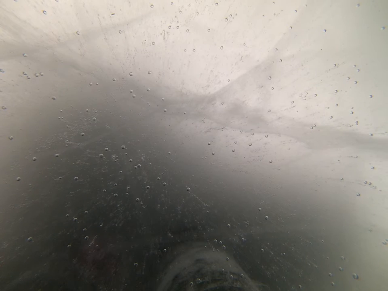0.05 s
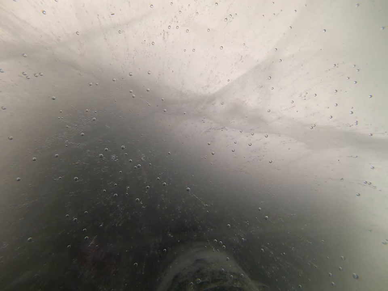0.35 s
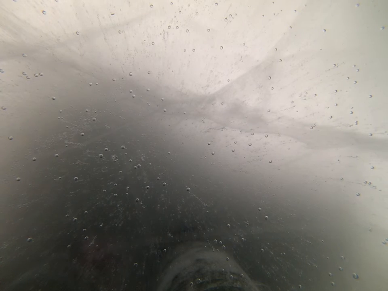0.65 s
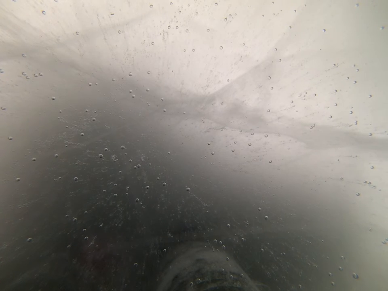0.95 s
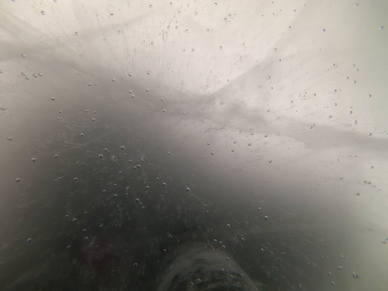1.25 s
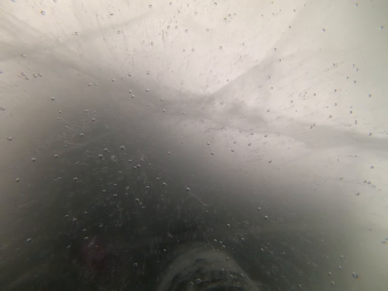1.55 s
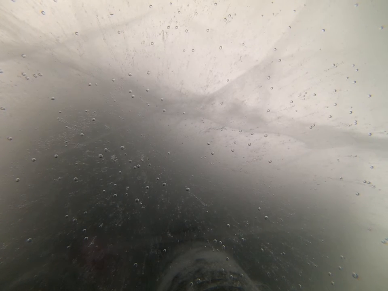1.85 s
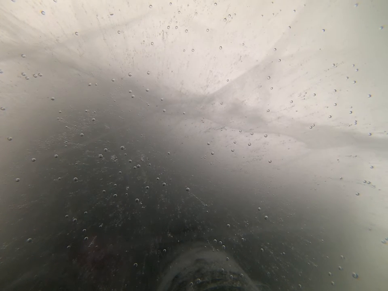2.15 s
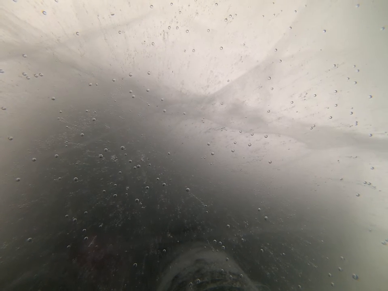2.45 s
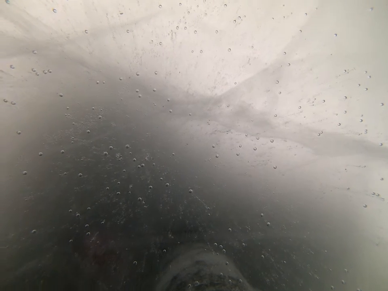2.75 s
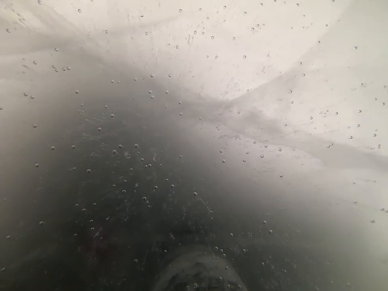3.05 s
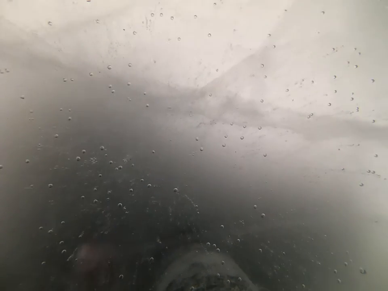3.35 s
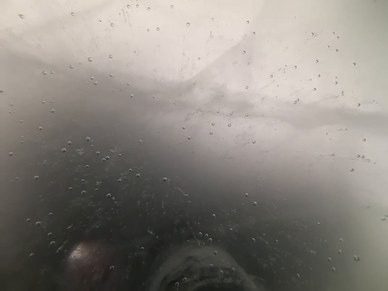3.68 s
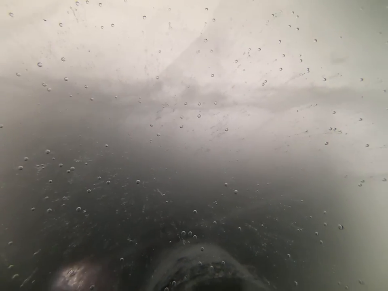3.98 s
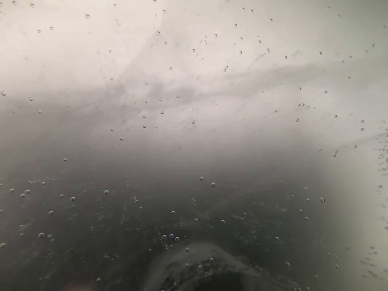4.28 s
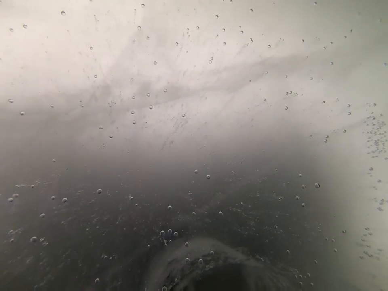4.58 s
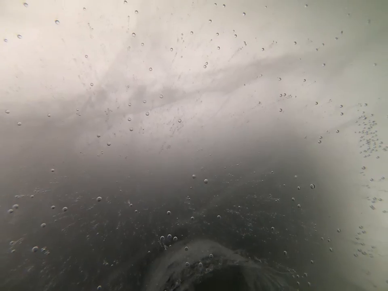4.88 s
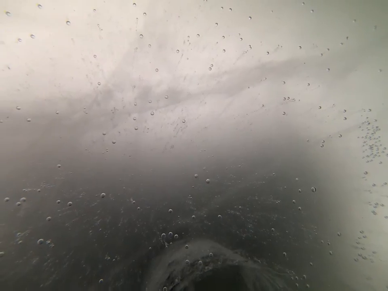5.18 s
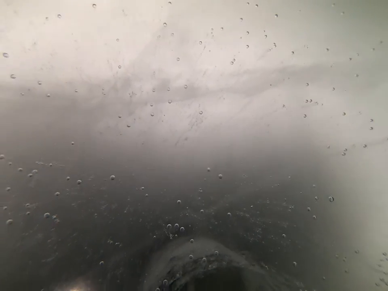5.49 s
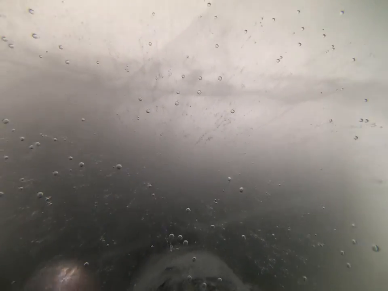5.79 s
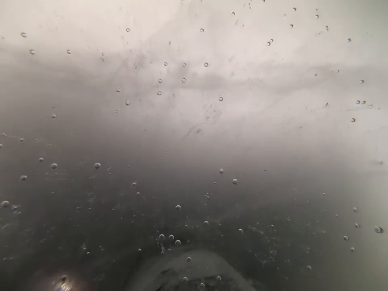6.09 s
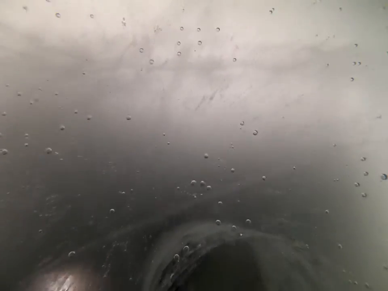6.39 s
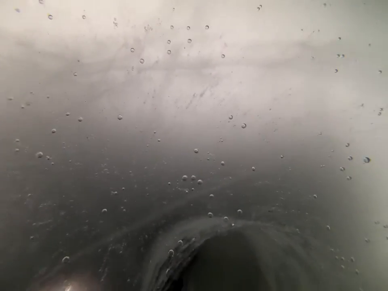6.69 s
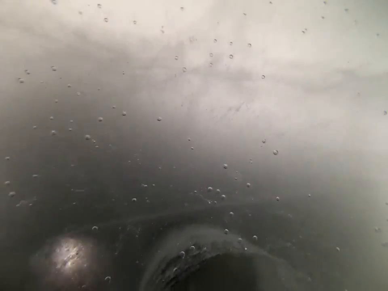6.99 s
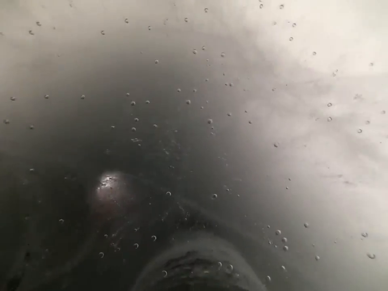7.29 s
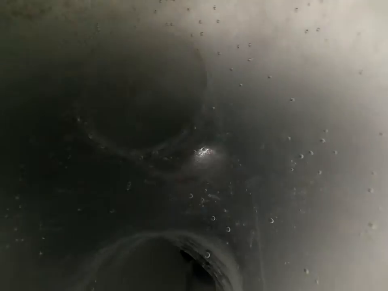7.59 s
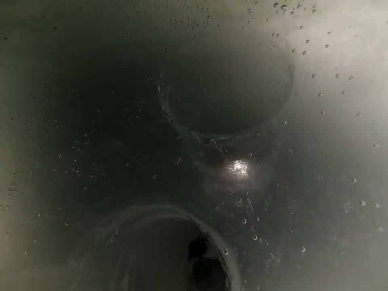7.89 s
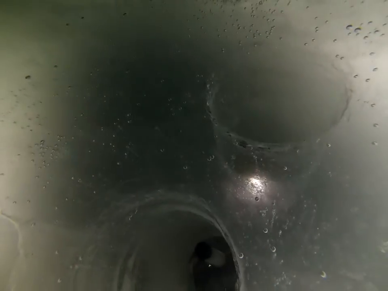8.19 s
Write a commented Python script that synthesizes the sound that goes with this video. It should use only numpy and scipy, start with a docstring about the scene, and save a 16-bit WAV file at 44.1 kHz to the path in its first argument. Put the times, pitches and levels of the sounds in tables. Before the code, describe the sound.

For the first three seconds, water washes quietly past a submerged microphone housing, with a low rumble, faint fizz and a wavering hollow tone. A few brief squeaks and a soft thud come in the first second, and a small cluster of bubbles near 1.9 seconds. At 3 seconds a pole strikes ice with a loud, hollow knock, a thud and a sharp click, followed by faint crackling. A deep, unsteady rumble starts and stays. A second hard knock lands at 3.6 seconds. From then on, muffled, gritty scraping strokes swell and ease, strongest from about 5.7 to 6.4 seconds. Lighter knocks are scattered through them, each a quick falling chirp with a short ring. Low thuds with dry clicks jolt the housing around 4.6, 5.5, 6.2, 7.5 and 8.1 seconds. Everything sounds very close and dull, ending just after 8 seconds.

```python
"""A pole knocks and scrapes on ice, carrying a camera in a waterproof housing under the water.
At first water washes quietly past, with a few bubbles and squeaks. Then come the knocks: high notes run
along the pole faster than low ones, so each is a quick falling chirp that leaves the camera mount ringing.
Each scraping stroke swells and eases. The pole sways with a deep rumble and jolts thud in the housing.
Sharp dry clicks are heard, mostly at the jolts, and a limiter turns down the hardest knocks."""
import sys
import numpy as np
from scipy import signal
from scipy.fft import rfft, irfft, next_fast_len
from scipy.io import wavfile
from scipy.ndimage import uniform_filter1d, minimum_filter1d, map_coordinates

SR = 44100
rng = np.random.default_rng(int(sys.argv[2]) if len(sys.argv) > 2 else 0)


def generate_wav(signal):
    """Clip the signal to [-1, 1] and save it as 16-bit WAV at the path in sys.argv[1]."""
    frames = np.transpose(np.atleast_2d(signal))
    scaled = np.clip(frames, -1, 1) * 32767
    pcm = np.round(scaled).astype(np.int16)
    wavfile.write(sys.argv[1], SR, pcm)


N = 367794
TIME = np.arange(N) / SR

# water passing the housing: t/s, wash/dB, fizz/dB, rumble/dB
WATER_FLOW = [(0, -46.5, -70, -44), (.25, -46, -69, -37.5), (.68, -50, -71, -42.5), (1.28, -47, -67, -40),
              (1.55, -45.5, -65.5, -41), (1.87, -42.5, -63.5, -39.5), (2.15, -45, -70, -44.5),
              (2.38, -45, -67, -39), (2.68, -47.5, -66, -39.5), (2.92, -38.5, -68, -32),
              (3.3, -48, -79.5, -23), (3.55, -39.5, -71.5, -37), (3.9, -41.5, -88.5, -35.5)]
# swirls of water brushing the housing: t/s, half length/s, wash swell/dB, swish swell/dB
SWIRLS = [(0.102, 0.013, -3, 2.5), (0.403, 0.066, 4.5, 1.5), (0.502, 0.017, 7.5, 4.5),
          (0.666, 0.013, 2.5, 2), (0.902, 0.043, 3.5, 3.5), (1.038, 0.014, 4, 3.5), (1.152, 0.028, 5, 1.5),
          (1.311, 0.037, 5, 0), (1.383, 0.027, 5, 9), (1.541, 0.011, 0, 6.5), (1.866, 0.0083, 5, 6),
          (2.227, 0.016, 5, 5.5), (2.377, 0.066, 4.5, 6), (3.22, 0.034, 6.5, 10)]
# tone colours of the water, from low to high: f/Hz, level/dB
RUMBLE_SPECTRUM = [(8, 1), (16, 11.5), (30, 11), (50, 5.5), (70, 1.5), (120, -12.5), (180, -15.5),
                   (300, -21), (600, -88.5)]
WASH_SPECTRUM = [(70, -4.5), (110, 3.5), (175, 2.5), (280, -6.5), (440, -5), (590, -2.5), (700, -4.5),
                 (810, -9.5), (950, -13), (1250, -20.5), (1800, -57.5)]
SWISH_SPECTRUM = [(900, 6.5), (1300, -5.5), (1590, 8.5), (1790, -1.5), (2000, -1), (2270, 5.5),
                  (2600, -2.5), (3050, -11.5), (4500, -23.5)]
FIZZ_SPECTRUM = [(2800, -17), (3600, 7), (4200, -1.5), (5000, 2), (5800, -1.5), (6600, 5.5), (7200, -1.5),
                 (7900, -7), (9300, -3), (10100, -8.5), (11000, -2), (12200, -16), (15500, -14)]
# the housing's hollow ring in the flow: t/s, f/Hz, level/dB
HOLLOW_NOTES = [(0, 700, -54), (.08, 688, -47), (.35, 667, -46), (.47, 606, -50), (.58, 575, -59.5),
                (.85, 600, -57), (1.15, 687, -50), (1.37, 650, -49.5), (1.48, 680, -55.5),
                (1.75, 587, -44.5), (1.9, 606, -48), (2.06, 678, -46.5), (2.2, 597.3, -60), (2.9, 594, -55),
                (3.5, 505, -54.5)]
# squeaks of the housing: t/s, rise/s, f/Hz, glide/(Hz per s), width/Hz, level/dB
HOUSING_SQUEAKS = [(0.069, 0.022, 1566, 0, 35, -54.5), (.21, 0.0097, 677, 0, 40, -38),
                   (0.199, 0.016, 1595, 0, 50, -55), (0.479, 0.016, 1620, -3, 50, -67),
                   (.87, 0.017, 1620, 0, 50, -63), (3.032, 0.011, 3880, -9000, 420, -61),
                   (3.561, .007, 1740, -3, 91.4, -43)]
# jolts of the mount: t/s, swing/dB, punch/dB
JOLTS = [(0.172, -11.5, -44), (2.957, -4, -7), (3.25, -10, -43), (3.272, -22.5, -20), (3.577, -3.5, -11.5),
         (4.598, -9.5, -9), (4.654, -9.5, -14.5), (4.786, -9, -16), (5.055, -9, -17), (5.508, -5, -4.5),
         (5.589, -6.5, -16), (5.795, -13.5, -29), (6.183, -7, -12), (6.244, -12, -10), (6.327, -14, -26),
         (6.451, -9, -24), (6.996, -14.5, -49), (7.519, -4, -10.5), (8.108, -6.5, -12)]
# the pole's two slowest ways of bending: t/s, first f/Hz, second f/Hz
SWAY_NOTES = [(3.14, 35.58, 41.96), (3.28, 27.48, 43.1), (4.05, 27.9, 46.3), (4.75, 29.95, 45.94),
              (5.35, 25.63, 43.52), (5.65, 35.26, 43.78), (6.15, 33.55, 46.77), (6.3, 32.06, 54.6),
              (6.6, 24.89, 52.3), (7.2, 23.67, 52.23), (7.35, 24.54, 43.7), (8.3, 24.88, 45.4)]
# how widely each of the two swings: t/s, level/dB
FIRST_SWAY = [(2.7, -73), (2.97, -19.5), (3.42, -17), (3.8, -25), (4.03, -40), (4.3, -23.5), (4.65, -29),
              (4.9, -22), (5.08, -17.5), (5.42, -28), (5.9, -17.5), (6.2, -16.5), (6.75, -19.5),
              (7.05, -20), (7.22, -31), (7.38, -15), (7.85, -21), (8.34, -31.5)]
SECOND_SWAY = [(2.7, -62), (3.0, -24), (3.42, -40), (3.65, -27), (4.2, -32.5), (4.62, -16.5), (5.0, -39),
               (5.2, -17.5), (5.38, -41.5), (5.7, -22), (6.1, -27.5), (6.28, -17.5), (6.55, -33),
               (7.25, -32.5), (7.52, -22), (7.9, -29), (8.34, -40.5)]
# ringing notes of pole and housing: f/Hz, level hanging free/dB, level gripped/dB, time to fade 60 dB/s
MOUNT_NOTES = [(198, 6, -4.5, 0.28), (211.5, -6, 7.5, 0.21), (236.7, 7, -3.5, 0.28), (297.4, 4, -5, 0.16),
               (344, -12, -2.5, 0.12), (420, -6, 1, 0.12), (500, -4, -3, 0.15), (570, -1.5, 4.5, 0.14),
               (618, 2.5, -3.5, 0.12), (785, 8.5, 5.5, 0.082), (826, 16.5, 7, 0.035), (875, -1, -1, 0.054),
               (936, -17, 5.5, 0.095), (1072, -19, -2, 0.069), (1254, 2, 0.5, 0.065),
               (1540, -13, -9, 0.055), (1646, 13, 3, 0.052), (2250, -5.5, 6, 0.029)]
# the pole hits the ice: t/s, level/dB, boom/dB, clack/dB, hard edge/dB, distance along the pole/m,
# note favoured by the contact point f/Hz, its boost/dB
ICE_KNOCKS = [(2.9555, -8, -0.5, -7.5, -32, 0.15, 416, -26), (3.031, -19, -0.5, -4.5, -24, 0.18, 607, 1),
              (3.5755, -2, -7.5, -4.5, -14.5, 0.418, 420, -2.5),
              (3.592, -18.5, -11.5, -0.5, -19, 0.39, 612, 3), (3.976, -47, -9, -12, 4.5, 0.8, 444, 8),
              (4.199, -52, 8, 4, 7.5, 0.61, 837, 10), (4.325, -29, -4.5, -18, -29, 0.51, 479, 26),
              (4.433, -49, 14.5, -19, -27, 0.71, 500, 2), (4.537, -32.5, 2, -8.5, -18, 0.45, 425, 0),
              (4.592, -41, 10, -5, -7, 0.68, 500, 1), (4.663, -41.5, -12, -9.5, -21, 0.45, 504, -1),
              (5.048, -34, 5, -9, -10.5, 0.57, 490, 1), (5.152, -45, -13, -0.5, -5, 0.68, 794, -3),
              (5.505, -29, 4, 2, 2, 0.94, 813, -8), (5.576, -38.5, 6, -1, 3.5, 0.93, 430, 7),
              (5.683, -31, 1, 2, 0.5, 1, 493, -6), (5.789, -25, -8, -8, -12, 0.99, 502, 14),
              (5.8736, -29.5, -8.5, 8, 3, 0.78, 780, 3), (6.179, -24.5, 0.5, 0.5, -16, 0.6, 341, 18),
              (6.239, -20, 0.5, -2.5, -12, 0.55, 570, 8), (6.289, -20.5, -3.5, -9, -16, 0.54, 337, 17),
              (6.306, -28, 1, 0, -8, 0.547, 584, 1), (6.324, -15, -2.5, -4.5, -12, 0.52, 570, -14),
              (6.392, -35, 9.5, 2, -2.5, 0.53, 341, 17), (6.453, -35.5, 9, -3, -25, 0.74, 877, 4),
              (6.477, -43, -2, -7, -11, 0.58, 536.5, 9), (6.512, -25, -6.5, -2.5, -8, 1, 567, -10),
              (6.72, -33, -3, -6, -9.5, 0.4, 440, -4), (6.736, -33, -6, -4.5, -12, 0.5, 434, 2),
              (6.982, -28, -2.5, -7, -11, 1, 491, 7), (6.998, -43, 8, -7, -13, 0.46, 414, -3),
              (7.117, -34.5, 1.5, 1.5, -6, 0.44, 564, 17), (7.513, -32.5, 3.5, -14, -8, 0.84, 433, 6),
              (7.682, -34, 4.5, -27, -33, 0.49, 411.4, 27), (7.74, -38.5, -6, -22, -1, 0.55, 487, 11),
              (8.105, -38, -11, -20, -10, 0.57, 490, -3), (8.28, -40, 0.5, -11, -11.5, 1, 492, -6)]
# five bands of a knock (boom, hollow, middle, clack, hard edge), each a list of: f/Hz, level/dB
KNOCK_BANDS = [
    [(45, -51), (110, 2), (160, 0.5), (215, 2.5), (310, -15), (1800, -87)],
    [(70, -57.5), (310, 1.5), (410, 9.5), (510, 4), (2800, -101)],
    [(130, -46.5), (470, 9), (580, 5), (720, -4.5), (3800, -100.5)],
    [(200, -48), (690, -1), (840, 6), (1050, -4.5), (1400, -6), (7000, -86.5)],
    [(400, -27.5), (1400, 5.5), (1650, 9.5), (1900, 9.5), (2300, 3), (3500, -6), (4400, -12.5), (6800, -22),
     (8500, -60.5), (15000, -58.5)],
]
# pitches the mount passes on poorly: f/Hz, width/Hz, level/dB
MOUNT_NOTCHES = [(692, 68, -7), (1180, 53, -1.5), (1386, 85, -5.5), (1890, 99, -11.5), (2457, 33, -8),
                 (2780, 100, -6), (4200, 130, -6.5), (4730, 330, -5)]
# sharp clicks, mostly during jolts: t/s, level/dB
CLICKS = [(2.957, -24.5), (2.966, -37), (2.984, -39), (3.049, -46.5), (3.065, -41.5), (3.09, -51),
          (3.115, -53), (3.157, -46), (3.174, -47.5), (3.198, -47), (3.229, -40.5), (3.260, -39),
          (3.274, -37.5), (3.37, -58), (3.388, -51), (3.418, -50.5), (3.443, -56), (3.577, -19.5),
          (3.594, -36.5), (3.597, -38), (3.609, -36), (3.632, -49), (3.658, -60), (3.714, -54), (3.78, -52),
          (3.976, -41), (4.158, -47), (4.604, -35.5), (4.659, -50), (4.671, -38.5), (5.048, -46.5),
          (5.065, -35), (5.085, -42.5), (5.108, -56), (5.515, -32), (5.522, -37), (5.613, -44),
          (5.683, -38), (5.768, -49), (5.877, -37), (5.9, -45), (6.007, -40.5), (6.179, -44.5),
          (6.2, -43.5), (6.246, -36), (6.258, -38), (6.288, -43), (6.307, -38), (6.343, -39.5), (6.46, -42),
          (6.479, -44), (6.513, -38.5), (6.648, -49), (6.983, -47), (7.34, -40.5), (7.38, -44),
          (7.397, -42.5), (7.509, -41), (7.525, -34), (7.544, -36.5), (7.627, -52.5), (7.741, -40.5),
          (8.114, -31.5), (8.125, -34)]
# tone colour of a click: f/Hz, level/dB
CLICK_SPECTRUM = [(500, -23.5), (1300, 11.5), (3500, 1.5), (6000, -3), (9000, -7.5), (15000, -16)]
# brief drops of the background after hard jolts: t/s, level/dB
BACKGROUND_DIPS = [(2.962, -13), (3.051, -6), (3.276, -4.5), (5.071, -1), (6.34, -1), (8.126, -9)]
# strokes along the ice: peak t/s, rise/s, fall/s, pressure/dB, sharpness/dB, singing f/Hz,
# singing/dB, chatter/dB
ICE_STROKES = [(3.89, 0.086, 0.071, -47.5, -3, 465, 1.5, -6), (3.992, 0.043, .13, -47, -3.5, 464, -0.5, 0),
               (4.061, 0.029, 0.045, -47.5, -5.5, 470, -1, -5), (4.164, 0.027, 0.084, -49, 3, 448, -13, 5),
               (4.258, 0.083, 0.023, -46, -10, 472, -3, 1), (4.33, 0.04, .085, -46, -6, 459, 3, -8),
               (4.44, 0.088, 0.045, -51.5, -5, 500, -10, -8), (4.586, 0.018, 0.04, -49, 2, 500, -4, -7),
               (4.79, 0.046, 0.049, -47.5, 4.5, 500, -18, -8), (4.94, 0.06, 0.099, -50, -7, 500, -8, -4),
               (5.03, 0.05, 0.051, -49, -8, 498, -7, -3), (5.329, 0.039, 0.038, -54.5, -8, 461, -15, -14),
               (5.62, 0.088, .08, -46, -11, 420, -11, 0), (5.719, .06, 0.04, -39.5, 0.5, 479, 6.5, 7),
               (5.795, 0.063, 0.063, -35.5, 4.5, 500, -7, 5), (5.869, 0.039, 0.072, -38.5, 0, 480, -6, 6),
               (5.878, 0.0053, 0.01, -37, 5, 478, -10, 3), (5.961, 0.028, 0.07, -40, 1.5, 500, -9, 7),
               (6.17, 0.078, 0.058, -38.5, 4, 518, -6, 8), (6.237, 0.038, 0.032, -37.5, 2, 576, -3, -4),
               (6.304, 0.017, 0.022, -35, 3, 589, -4, -4), (6.385, 0.034, 0.079, -44, 5, 541, -2, 7),
               (6.487, 0.033, 0.057, -45.5, -1, 551, -8, 7), (6.514, 0.0071, 0.026, -50, 10.5, 580, 15, 12),
               (6.65, 0.023, 0.03, -51.5, 3.5, 552, -13, -1),
               (6.785, .075, 0.066, -47, 5.5, 542, -16, 11.5), (6.9, 0.047, 0.044, -45, 5, 548, -5, -2),
               (6.975, 0.052, .05, -43.5, 4.5, 512, -2, -3), (7.136, 0.12, .048, -40, 2.5, 539, -2, 4),
               (7.39, 0.042, 0.046, -52.5, 0, 427, -9, 0), (7.508, 0.093, 0.045, -45, 3, 431, -6, 3),
               (7.621, .03, 0.044, -48, 3.5, 458, 5.5, 9), (7.745, 0.099, 0.11, -43.5, 2.5, 508, -3.5, -7),
               (8.075, 0.14, 0.067, -50, 3, 500, -18, 6.5)]
# tone colours of scraping, from low to high: f/Hz, level/dB
DRAG_SPECTRUM = [(110, -25.5), (165, -23), (210, 0), (290, -12.5), (380, 4), (480, 3.5), (590, -4),
                 (700, 5.5), (860, -20.5), (1080, -10.5), (1400, -57), (2000, -74)]
GRIT_SPECTRUM = [(900, -6.5), (1250, -1), (1430, 6), (1680, 3.5), (1950, 6.5), (2300, 0), (2700, -8),
                 (3300, -31.5), (8000, -67)]
RASP_SPECTRUM = [(2000, -28), (2650, 1), (3400, -1), (3950, 0.5), (4450, -0.5), (5500, 0), (6200, -13),
                 (6800, -5), (7500, -20), (15000, -33)]
# notes that sing in a stroke: multiple of the singing pitch, level/dB
SINGING_NOTES = [(0.999, -6.5), (1.57, -10), (2.12, -19.5), (3.02, -21), (4.15, -17)]
# the pitch above which the contact dulls the sound, moving as the pole turns: t/s, f/Hz
TREBLE_EDGE = [(3.64, 15000), (3.7, 4100), (5.45, 4140), (5.49, 5900), (5.69, 5960), (5.72, 4200),
               (5.86, 4200), (5.876, 7100), (5.9, 4200), (6.05, 4030), (6.2, 3580), (6.33, 3413),
               (6.39, 2820), (6.46, 3520), (6.52, 3850), (6.98, 3600), (7.12, 4200), (8.3, 4200)]
# difference between the two microphone openings: f/Hz, level/dB
STEREO_DIFFERENCE = [(25, -49), (100, -39.5), (500, -52), (1000, -41), (2000, -42), (4000, -19), (8000, -4),
                     (15000, -5.5)]
# tone colours of the hiss and of a faint steady noise that comes in during the scraping: f/Hz, level/dB
HISS_SPECTRUM = [(100, -7), (1500, -16), (3500, -3), (6000, -2), (11000, 0), (15500, -12)]
LATE_NOISE_SPECTRUM = [(60, 9.5), (180, -0.5), (700, -3), (1400, -8), (2800, -2.5), (5600, 1.5),
                       (11000, -3.5), (15000, -16)]

GRIP_STARTS_S, SCRAPE_STARTS_S, WASH_ENDS_S, LATE_NOISE_STARTS_S = 3.4, 3.6, 3.62, 3.8
WAVE_M_PER_S = 566  # how fast a 1 kHz bend travels along the pole


def amp(db):
    """Turn decibels into a factor to multiply by."""
    return 10 ** (np.asarray(db) / 20)


def unit(x):
    """Scale to an average (rms) level of 1."""
    return x / np.sqrt(np.mean(x ** 2) + 1e-20)


def gain_at(spectrum, hz):
    """Read a spectrum table as factors, blending its rows on a log frequency scale."""
    f, db = np.transpose(spectrum)
    return amp(np.interp(np.log(hz + 1), np.log(f + 1), db))


def curves(rows):
    """Turn each column after the time into one value per sample."""
    s, *columns = np.transpose(rows)
    return [np.interp(TIME, s, column) for column in columns]


def wobble(rate):
    """A smooth curve through `rate` random values a second."""
    return map_coordinates(rng.standard_normal(int(N * rate / SR) + 4), [TIME * rate])


def after(s, fade_s=0.033):
    """Rise from 0 to 1 around time s."""
    return np.clip((TIME - s) / fade_s + .5, 0, 1)


def struck(t, attack_s, t60):
    """A quick rise, then a fade of 60 dB every t60 seconds."""
    return (1 - np.exp(-t / attack_s)) * amp(-60 * t / t60)


def filtered(x, response):
    """Multiply each frequency in x by response(hz)."""
    n = x.shape[-1]
    padded = next_fast_len(n + 8192)
    return irfft(rfft(x, padded) * response(np.fft.rfftfreq(padded, 1 / SR)), padded)[..., :n]


def coloured(x, spectrum):
    """Give x a tone colour, at rms 1."""
    return unit(filtered(x, lambda hz: gain_at(spectrum, hz)))


def noise(spectrum, shape=N):
    """Noise with a tone colour, at rms 1."""
    return coloured(rng.standard_normal(shape), spectrum)


def causal(gain):
    """A filter with these gains that never sounds before its cause."""
    cepstrum = irfft(np.log(gain))
    half = cepstrum.shape[-1] // 2
    return np.exp(rfft(cepstrum * np.r_[1, np.full(half - 1, 2), np.zeros(half)]))


def resonate(x, hz, width_hz):
    """Make x ring in a narrow band whose pitch may move, at rms 1."""
    turn = np.exp(2j * np.pi * np.cumsum(hz) / SR)
    decay = np.exp(-np.pi * width_hz / SR)
    return unit((turn * signal.lfilter([1], np.poly([decay, decay]), x / turn)).real)


def add(track, s, sound):
    """Mix a sound into a track at time s."""
    start = max(round(s * SR), 0)
    track[start:start + len(sound)] += sound[:N - start]


def water(wash_gain_db=1, swish_gain_db=-18.17, fizz_gain_db=2):
    """A soft wash, a swish and a fine fizz swell with the swirls, until the scraping starts."""
    wash_db, fizz_db, _ = curves(WATER_FLOW)
    swish_db = wash_db.mean() + 0.76 * (fizz_db - fizz_db.mean())
    swells = sum(np.outer([low, high], np.exp(-((TIME - s) / half) ** 2))
                 for s, half, low, high in SWIRLS)
    low_db, high_db = swells + 0.88 * wobble(11)
    wash = amp(wash_db + wash_gain_db + low_db + 2.26 * wobble(49)) * noise(WASH_SPECTRUM)
    swish = amp(swish_db + swish_gain_db + high_db) * noise(SWISH_SPECTRUM)
    fizz = amp(fizz_db + fizz_gain_db + 0.86 * high_db + 1.4 * wobble(21.2)) * noise(FIZZ_SPECTRUM)
    return (wash + swish + fizz) * (1 - after(WASH_ENDS_S))


def rumble(pressure, stroke_gain_db=14, surge_db=2.5):
    """Flowing water rumbles on the housing, more so during a stroke."""
    flow = amp(curves(WATER_FLOW)[2])
    surge = amp(surge_db * wobble(4.4))
    return (flow + amp(stroke_gain_db) * pressure) * surge * noise(RUMBLE_SPECTRUM)


def hollow_ring(gain_db=-1, width_hz=60, wander_hz=12, unsteady_db=2):
    """The flow makes a hollow of the housing ring at a wandering pitch."""
    hz, db = curves(HOLLOW_NOTES)
    ring = resonate(rng.standard_normal(N), hz + wander_hz * wobble(12), width_hz)
    return amp(db + gain_db + unsteady_db * wobble(18)) * ring * (1 - after(WASH_ENDS_S))


def squeaks():
    """Now and then the housing gives a brief, hoarse tone that swells and fades."""
    out, t = np.zeros(N), np.arange(SR // 3) / SR
    for s, rise_s, hz, glide, width_hz, db in HOUSING_SQUEAKS:
        swell = t / rise_s * np.exp(1 - t / rise_s)
        tone = resonate(rng.standard_normal(len(t)), hz + glide * t, width_hz)
        add(out, s, amp(db) * swell * tone)
    return out


def thuds(start_hz=70, rest_hz=37, settle_s=0.013, punch_hz=88, swing_gain_db=1, punch_gain_db=2):
    """A jolt gives a short punch and a slower swing that sags in pitch as it dies."""
    out, t = np.zeros(N), np.arange(SR // 2) / SR
    cycles = rest_hz * t + (start_hz - rest_hz) * settle_s * (1 - np.exp(-t / settle_s))
    swing = np.sin(2 * np.pi * cycles) * struck(t, attack_s=0.011, t60=0.3)
    punch = np.sin(2 * np.pi * punch_hz * t) * struck(t, attack_s=0.0034, t60=0.079)
    for s, swing_db, punch_db in JOLTS:
        add(out, s, -amp(swing_db + swing_gain_db) * swing - amp(punch_db + punch_gain_db) * punch)
    return out


def bubbles(start_s=1.858, length_s=0.018, count=7, hz=620, spread=0.17, db=-31):
    """A small cluster of air bubbles rings softly in the water."""
    out, t = np.zeros(N), np.arange(SR // 4) / SR
    fade = amp(db) * struck(t, attack_s=0.00042, t60=0.12)
    for k, (jitter, detune) in enumerate(rng.uniform(-1.14, 1, (count, 2))):
        tone = np.sin(2 * np.pi * hz * (1 + spread * detune) * t)
        add(out, start_s + length_s * (k + 1 + jitter / 2) / count, fade * tone)
    return out


def sway(gain_db=-1, wander_hz=2.1, unsteady_db=0.7):
    """Once moved, the pole swings unsteadily at two very low pitches that shift with the grip."""
    out = np.zeros(N)
    for hz, db in zip(curves(SWAY_NOTES), curves(FIRST_SWAY) + curves(SECOND_SWAY)):
        cycles = np.cumsum(hz + wander_hz * wobble(18)) / SR
        level = amp(db + gain_db - unsteady_db * wobble(9))
        out += level * np.sqrt(2) * np.sin(2 * np.pi * cycles)
    return out * np.interp(TIME, [2.6, 2.9], [0, 1])


def mount_ring(ring_db, strengths, gripped=True, grip_t60=0.41):
    """A push and the ringing it leaves in the mount; a firm grip rebalances and shortens the notes."""
    t = np.arange(SR // 2) / SR
    notes = sum(share * amp((held_db if gripped else free_db) - 60 * t / t60) * np.cos(2 * np.pi * hz * t)
                for (hz, free_db, held_db, t60), share in zip(MOUNT_NOTES, strengths))
    return (t == 0) + amp(ring_db - gripped * 60 * t / grip_t60) * notes / SR


def knocks(gain_db=3, lead_s=0.00023, scuff_s=0.0032, scuff_db=-12, clean_db=-20, contact_width_hz=22):
    """Bends travel faster at high pitch, so each blow is a falling chirp, longer from further away."""
    out, t, hz = np.zeros(N), np.arange(SR) / SR, np.fft.rfftfreq(SR, 1 / SR)
    band_filters = causal(np.array([gain_at(band, hz) for band in KNOCK_BANDS]))
    scuff = amp(scuff_db) * 2 * t / scuff_s * np.exp(1 - 2 * t / scuff_s)
    damping = 1j * hz * contact_width_hz
    for s, db, boom_db, clack_db, edge_db, metres, contact_hz, contact_db in ICE_KNOCKS:
        contact = 1 + amp(contact_db) * damping / (contact_hz ** 2 - hz ** 2 + damping)
        travel = np.exp(-4j * np.pi * metres / WAVE_M_PER_S * np.sqrt(hz * 1000))
        # hard, square blows are one clean push; weak, glancing ones scuff along briefly
        glancing = 1 / (1 + amp(db - clean_db) ** 2)
        force = (t == 0) * (1 - glancing / 2) + glancing * scuff * rng.standard_normal(SR)
        strengths = rng.uniform(.8, 1.2, len(MOUNT_NOTES))
        ring = mount_ring(37 + 6 * glancing, strengths, gripped=s > GRIP_STARTS_S)
        bands = irfft(rfft(force) * rfft(ring, SR) * contact * travel * band_filters, SR)
        loudest = np.sqrt(uniform_filter1d(bands ** 2, size=220).max(axis=1))  # rms over 5 ms
        band_db = np.array([boom_db, 0, -2, clack_db, edge_db])
        add(out, s - lead_s, (amp(band_db + db + gain_db) / loudest) @ bands)
    return out


def notched(x):
    """Narrow gaps between the mount's ringing notes make x sound hollow."""
    hz = np.fft.rfftfreq(SR, 1 / SR)
    db = sum(depth * np.exp(-((hz - centre) / width) ** 2) for centre, width, depth in MOUNT_NOTCHES)
    return signal.fftconvolve(x, irfft(causal(amp(db))))[:N]


def clicks(attack_s=0.00009, t60=0.019, gain_db=-3.5, crackle_s=(3.0, 3.82), crackle_count=22):
    """Sharp dry clicks, mostly at the peaks of the jolts; a faint crackle follows the first big knock."""
    out, t = np.zeros(N), np.arange(SR // 20) / SR
    fade = amp(-60 * t / t60) * (1 - np.exp(-t / attack_s)) ** 2
    crackle = [(rng.uniform(*crackle_s), rng.normal(-56, 3)) for _ in range(crackle_count)]
    for s, db in list(CLICKS) + crackle:
        add(out, s, amp(db + gain_db) * fade * noise(CLICK_SPECTRUM, len(t)))
    return out


def dips(recovery_db_per_s=43.5):
    """A volume curve that drops quickly after hard jolts and comes back steadily."""
    db = sum((TIME > s) * np.minimum(depth + recovery_db_per_s * (TIME - s), 0)
             for s, depth in BACKGROUND_DIPS)
    return uniform_filter1d(amp(db), size=180)


def strokes(resting_db=-62, edge_db=-11.5, roundness=1.25):
    """Each stroke swells and eases; gives curves of pressure, sharpness, singing and chatter."""
    power = np.full((4, N), amp(resting_db) ** 2)
    for s, rise, fall, db, sharp_db, _, sing_db, chatter_db in ICE_STROKES:
        from_peak = np.maximum((s - TIME) / rise, (TIME - s) / fall)
        near = from_peak < 2
        shares_db = np.array([[0], [sharp_db], [sing_db], [chatter_db]])
        power[:, near] += amp(db + edge_db * from_peak[near] ** roundness + shares_db) ** 2
    return np.sqrt(power) * after(SCRAPE_STARTS_S)


def scrape(pressure, sharpness, singing, chatter, slips_per_s=500, usual_db=-49, chatter_hz=850):
    """Clumps of tiny slips on rough ice shake the mount; the contact point sings and chatters."""
    sizes = rng.standard_normal(N) * amp(2.5 * rng.standard_normal(N))
    slips = unit(sizes * (rng.random(N) < slips_per_s / SR))
    force = (slips + rng.standard_normal(N)) * amp(1.5 * wobble(70) + wobble(14))
    ring = mount_ring(ring_db=45.5, strengths=np.ones(len(MOUNT_NOTES)))
    shaken = signal.fftconvolve(force, ring)[:N]
    # pressing harder brings out the low drag
    drag = amp(usual_db + 6) * (pressure / amp(usual_db)) ** 1.06 * coloured(shaken, DRAG_SPECTRUM)
    grit = amp(-1) * pressure * coloured(shaken, GRIT_SPECTRUM)
    rasp = amp(-12) * sharpness * coloured(shaken, RASP_SPECTRUM)
    sing_hz = curves(ICE_STROKES)[4]
    notes = sum(amp(db + 6) * resonate(force, ratio * sing_hz, width_hz=42)
                for ratio, db in SINGING_NOTES)
    rattle = amp(-7.5) * chatter * resonate(force, chatter_hz + 22 * wobble(12), width_hz=105)
    return drag + grit + rasp + singing * notes + rattle


def muffled(x, depth_db=-11, slope_hz=90):
    """The contact dulls everything above its moving treble edge."""
    hz, t, frames = signal.stft(x, SR, nperseg=256)
    edge_hz = np.interp(t, *np.transpose(TREBLE_EDGE))
    above = (1 + np.tanh((hz[:, None] - edge_hz) / slope_hz)) / 2
    return signal.istft(frames * amp(depth_db * above), SR, nperseg=256)[1][:N]


def scene(late_noise_db=-69.5, hiss_db=-76):
    """Left and right are nearly the same, over faint steady noise that differs in each channel."""
    pressure, sharpness, singing, chatter = strokes()
    dip = dips()
    on_ice = knocks() + dip * scrape(pressure, sharpness, singing, chatter)
    handling = muffled(notched(on_ice)) + clicks() + thuds()
    sound = handling + sway() + bubbles() + squeaks()
    sound += dip * (rumble(pressure) + water() + hollow_ring())
    side = filtered(handling, lambda hz: 1j * gain_at(STEREO_DIFFERENCE, hz))  # 1j: quarter-cycle shift
    late_noise = amp(late_noise_db) * after(LATE_NOISE_STARTS_S) * noise(LATE_NOISE_SPECTRUM, (2, N))
    hiss = amp(hiss_db) * noise(HISS_SPECTRUM, (2, N))
    return np.array([sound + side, sound - side]) + dip * (late_noise + hiss)


def record(dry, release_db_per_s=52, top_hz=15500):
    """A limiter holds the hardest knocks at full scale and lowers their ring; the top treble is cut."""
    needed_db = -20 * np.log10(np.maximum(np.abs(dry).max(axis=0), 1))
    recovery = release_db_per_s * TIME
    held_db = np.minimum.accumulate(minimum_filter1d(needed_db, size=45) - recovery) + recovery
    limited = dry * amp(uniform_filter1d(held_db, size=45))
    return filtered(limited, lambda hz: hz < top_hz)


dry = scene()
out = record(dry)
generate_wav(out)
```